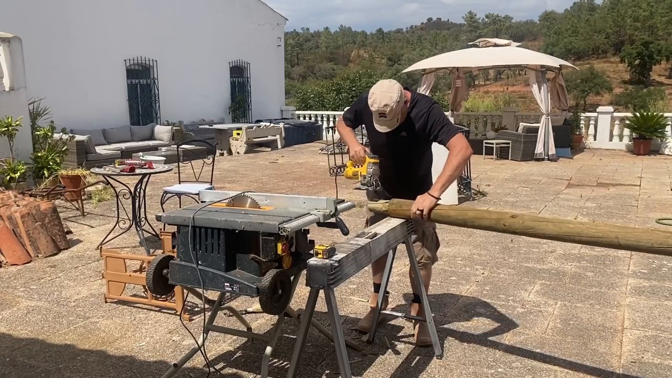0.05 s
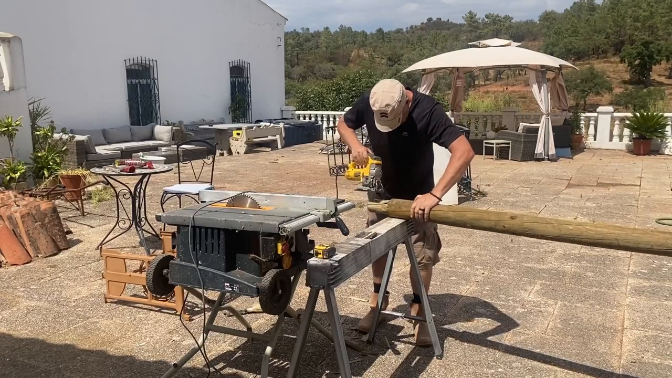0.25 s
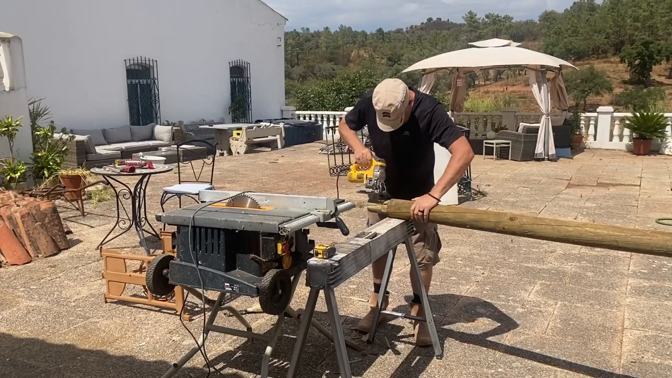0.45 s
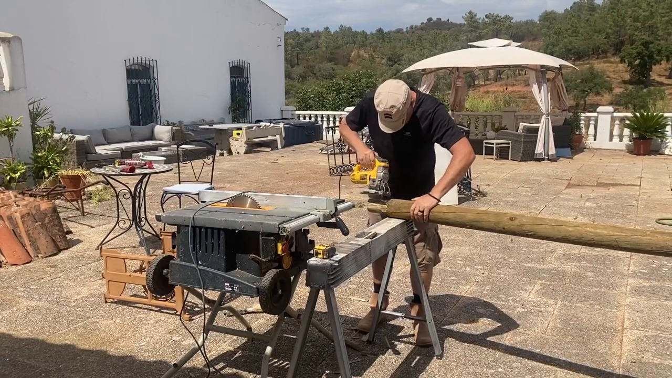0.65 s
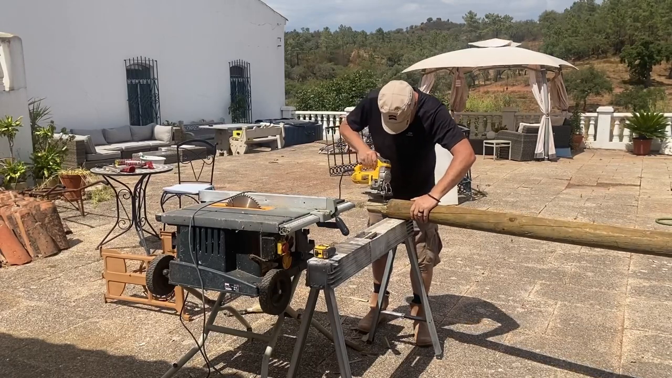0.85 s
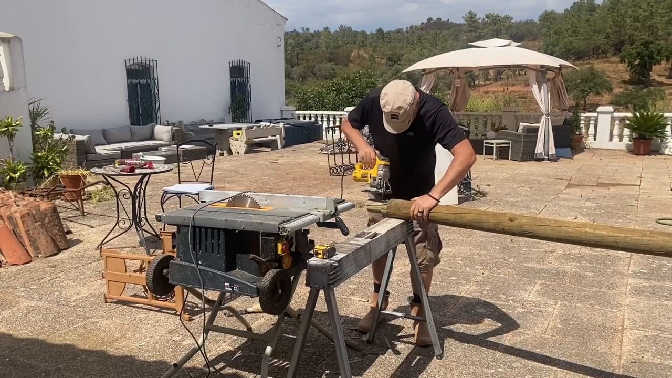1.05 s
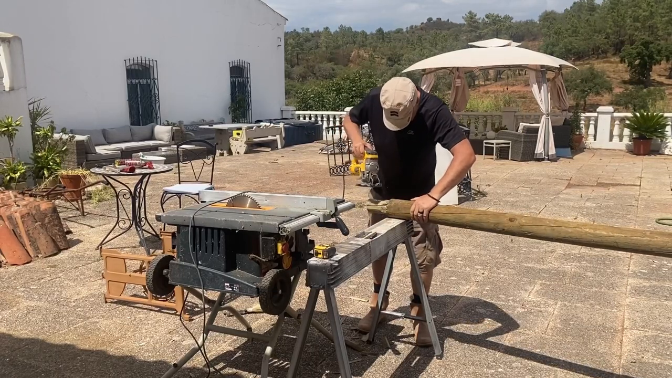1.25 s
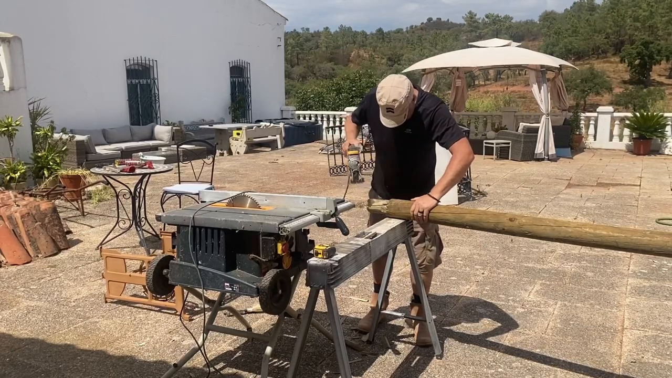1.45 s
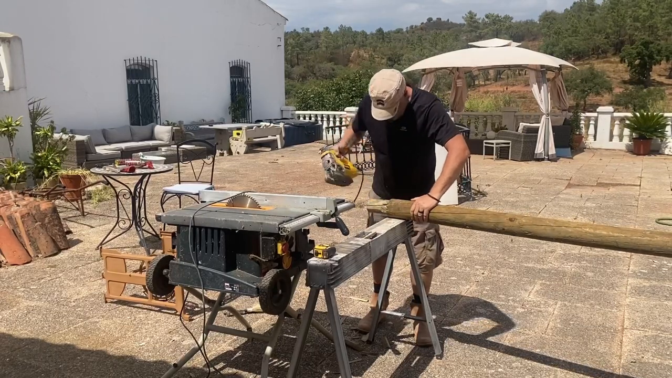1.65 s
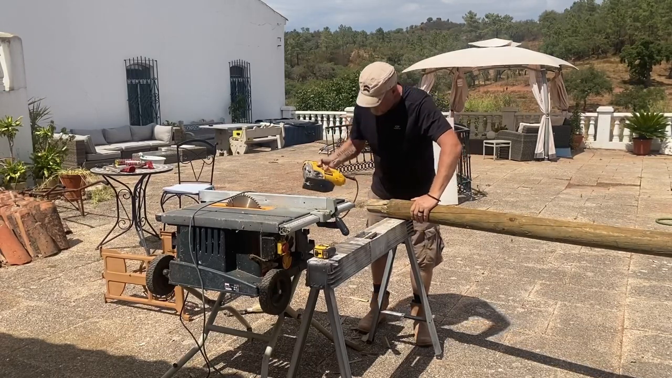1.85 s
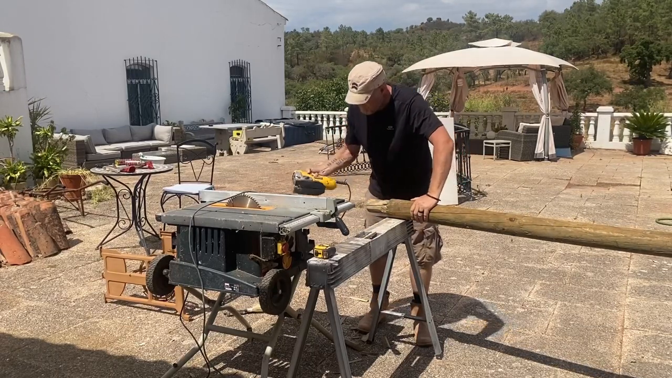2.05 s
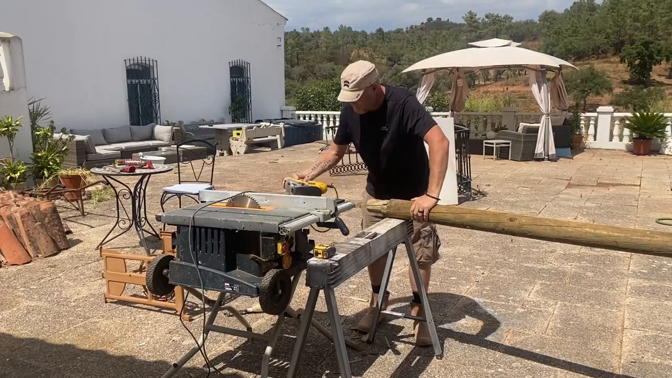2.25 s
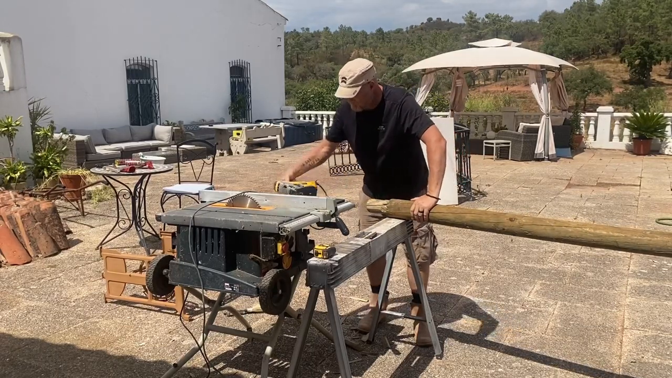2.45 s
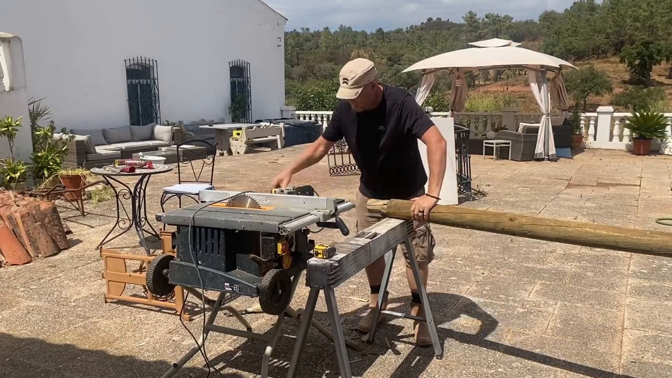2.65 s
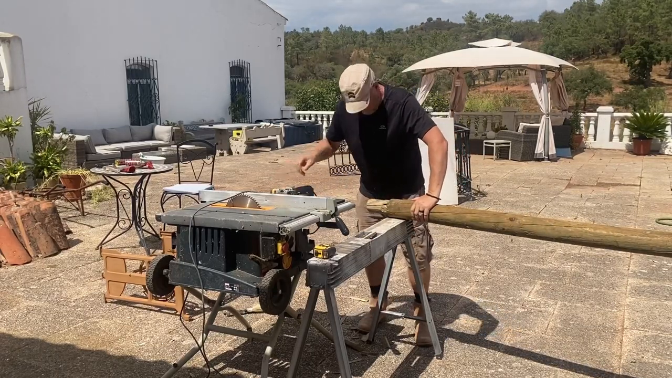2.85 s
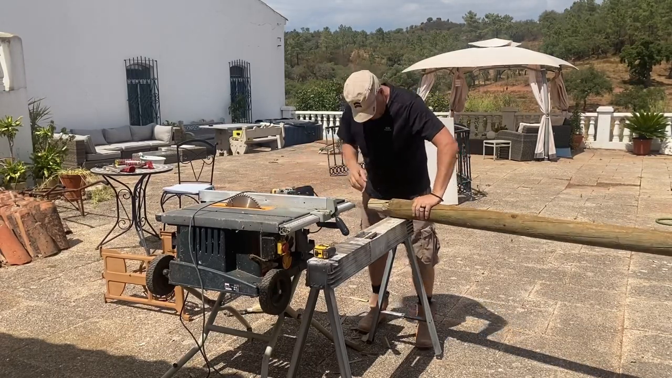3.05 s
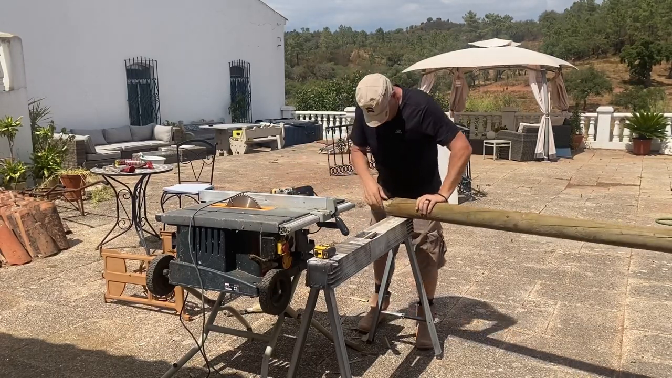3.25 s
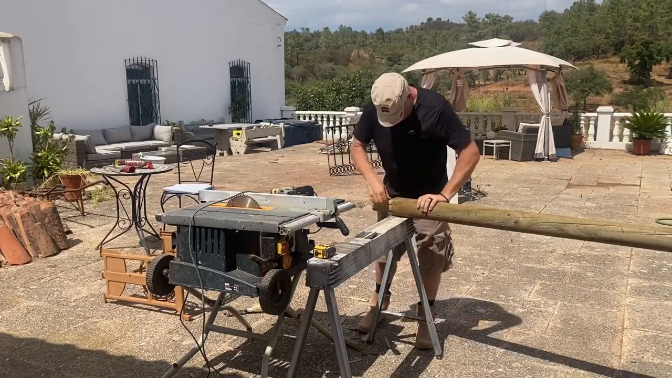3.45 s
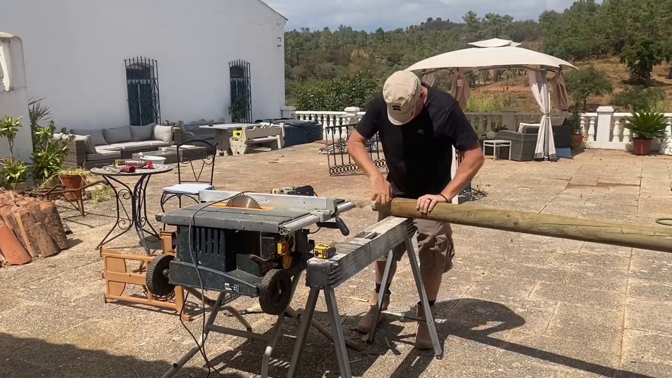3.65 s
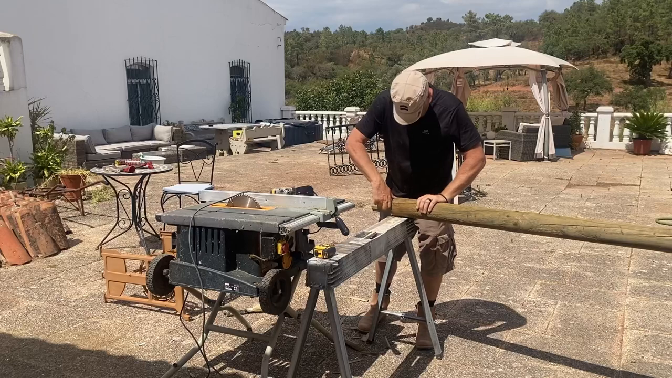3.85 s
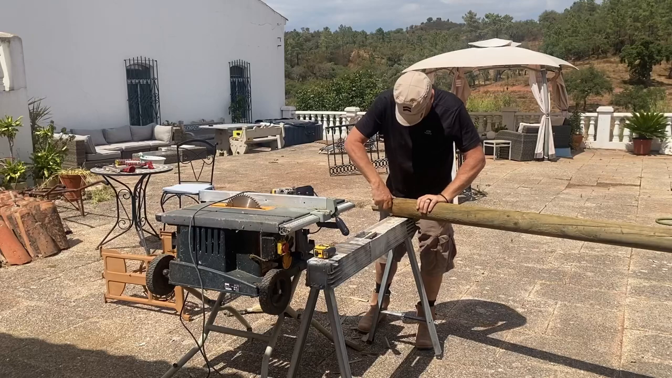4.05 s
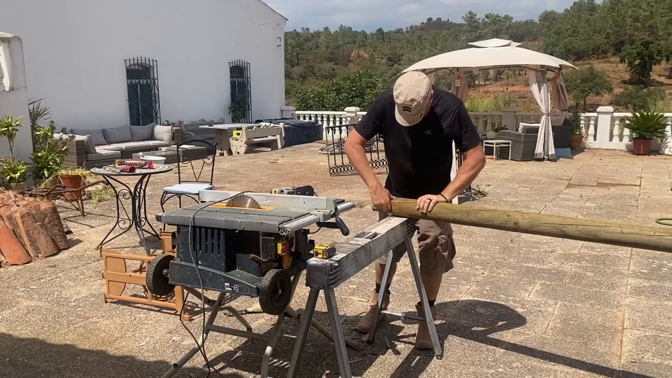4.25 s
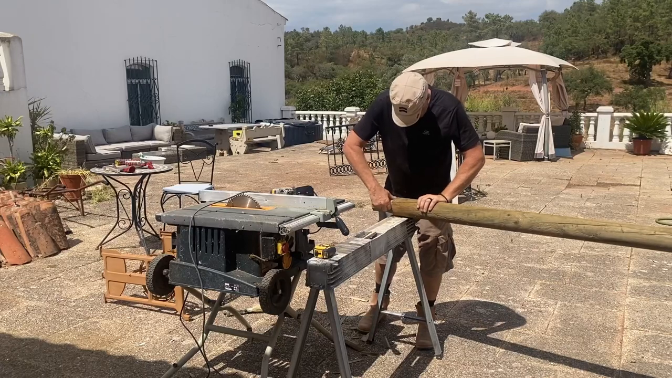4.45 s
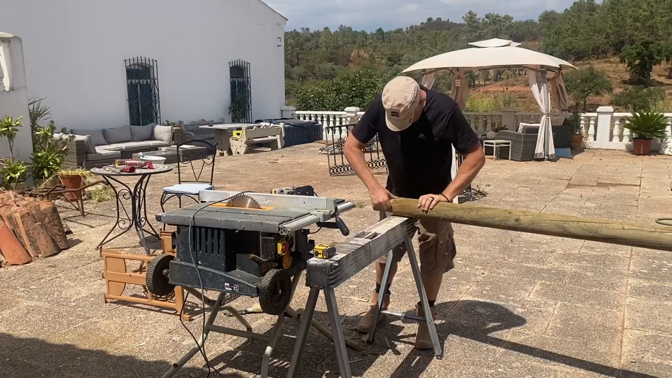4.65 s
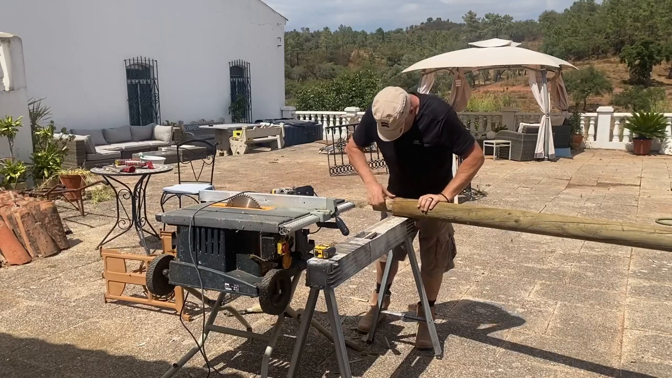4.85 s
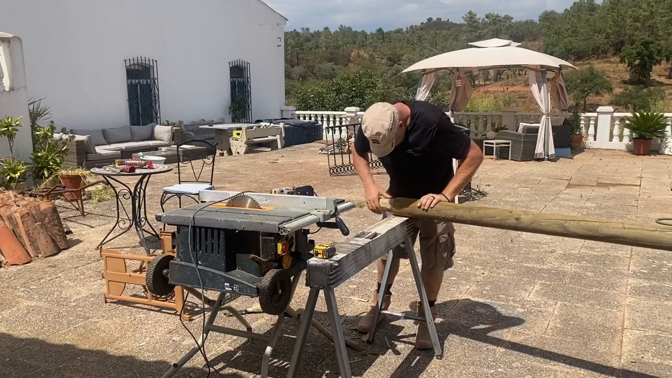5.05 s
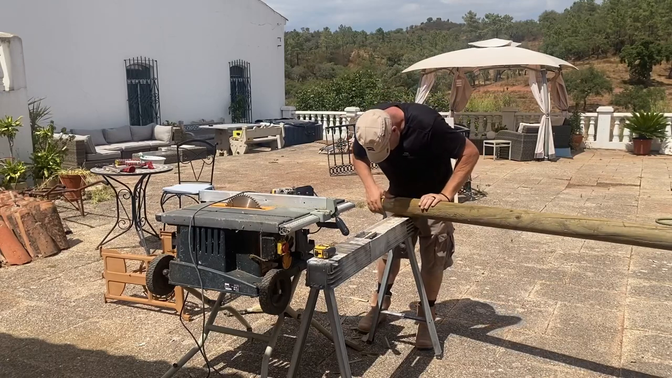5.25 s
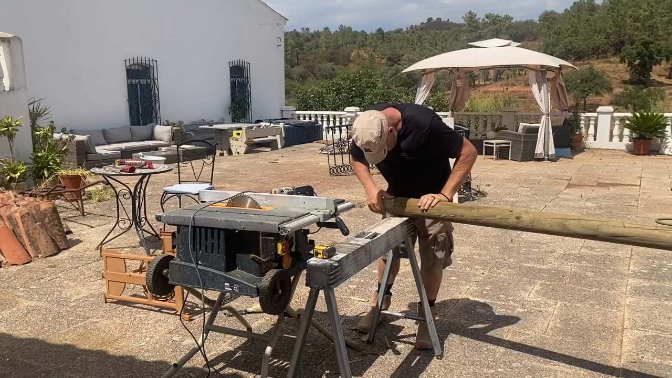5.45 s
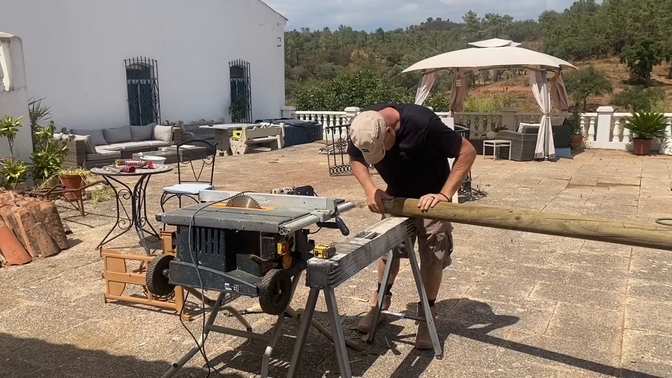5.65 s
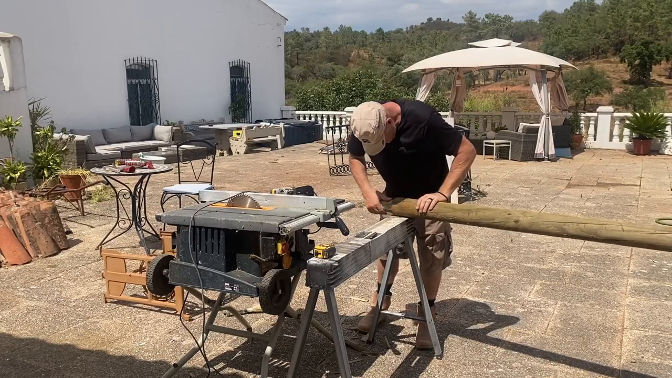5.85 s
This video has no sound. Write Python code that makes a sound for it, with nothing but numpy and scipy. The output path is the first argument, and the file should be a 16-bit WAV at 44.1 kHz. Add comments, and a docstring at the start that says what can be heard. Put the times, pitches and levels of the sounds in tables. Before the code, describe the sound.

On an open paved terrace, a handheld electric planer is already coasting down. At 0 s it is loudest: bright fan hiss, a dense midrange rattle pulsing with the belt, and a thin whine near 10 kHz that glides steadily downward and fades by about 2 s. At 0.8 s it knocks a wooden beam with a sharp crack and hollow double thump. Irregular harder clacks stand out from 1.0 to 2.1 s as the rattle slows and softens. At 2.25 s it bumps a metal saw table; a short whistle-like squeak breaks into a rasp at 2.4 s, then a heavy, ringing clunk at 2.67 s. Uneven judders and slowing slaps follow, with a brief low grating until it stops at 3.6 s. Then it is quiet: a soft low breeze freshens slightly, with small dry splinter snaps at 3.85, 4.02, 4.56 and 4.8 s, and faint finger rubs and ticks near 5.7 s.

```python
"""A handheld electric planer coasts to a stop on a walled terrace: its fan hisses, its drive rattles, a thin whine sinks.
One falling speed curve drives its whine, hums, belt slap and noise levels.
It knocks once against the beam, then is laid on a metal saw table with a bump, a squeak and a clunk: noise and modes.
Fingers pick splinters from the end of the beam, as short noise bursts and wood modes, over a light breeze of noise."""
import sys
import numpy as np
from scipy import signal
from scipy.fft import rfft, irfft
from scipy.io import wavfile
from scipy.ndimage import uniform_filter1d

SR = 44100
rng = np.random.default_rng(int(sys.argv[2]) if len(sys.argv) > 2 else 0)


def store_pcm(level_fs):
    """Save levels as 16-bit WAV."""
    pcm = np.round(np.clip(level_fs, -1, 1) * 32767).astype(np.int16)
    wavfile.write(sys.argv[1], SR, np.atleast_2d(pcm).T)


N = 260618
TIME = np.arange(N) / SR

# Spectrum of the drive's rattle. Each row: frequency in Hz, relative density in dB per Hz.
RATTLE_COLOUR = [(200, -35.5), (300, -22), (380, -9.5), (460, -5.5), (640, -14.5), (760, 2), (900, -0.5),
                 (1180, -9), (1450, -3), (2100, -3), (2650, -4.5), (3300, -4), (3900, -12.5), (4700, -11),
                 (5600, -23), (7200, -44.5)]
# Resonances of the planer's housing. Each row: frequency in Hz, width in Hz, lift in dB.
HOUSING_PEAKS = [(816, 140, 3.5), (1470, 290, 4), (1650, 70, 2.5), (1900, 130, 4), (2360, 70, 4),
                 (3000, 120, 4), (3140, 70, -4), (3300, 170, 5.5)]
# The sole grazes beam and table. Each row: start in seconds, length in seconds, drone in dB, added rattle in dB.
GRAZES = [(0.94, 0.35, -64, -48.5), (1.439, 0.17, -59.5, -87), (2.266, 0.24, -44, -52),
          (3.05, 0.1, -63, -64)]
# Modes of the wooden beam. Each row: frequency in Hz, relative level in dB, t60 in seconds.
BEAM_MODES = [(380, -8.5, .28), (537, 1, .22), (717, -1, 0.23), (888, -3, .24), (1035, -8, 0.084),
              (1088, -11.5, 0.13), (1270, -15, .16), (1640, -15.5, .16), (1725, -16.5, .16),
              (2300, -21.5, .11), (2927, -15.5, .09)]
# Phase between the two microphone ports. Each row: frequency in Hz, lead of the left in radians.
PORT_LEAD = [(80, .1), (250, .45), (650, .75), (1400, .6), (2900, .85), (3800, .2), (4800, .25),
             (5600, -.3), (6100, .3), (7200, -.2), (8000, -1.6), (9000, -3.2), (10200, -5.2), (11500, -6.3),
             (13000, -9.3)]
# Level between the two ports. Each row: frequency in Hz, left minus right in dB.
PORT_BALANCE = [(140, -1), (300, 2.5), (600, 4), (1300, 5), (2100, 5), (3100, 7.5), (4200, 6.5), (5400, 12),
                (6400, 3), (7200, .5), (12000, 0)]


def planer():
    """One sinking speed drives the whine, the hums, the slap of the drive belt and the fan's hiss."""
    # Rotor speed, given by the pitch of its whine. Each row: time in seconds, pitch in Hz.
    speed_curve = [(0, 10190), (.3, 9200), (.6, 8248), (.9, 7320), (1.0, 7070), (1.4, 5982), (1.8, 5146),
                   (2.15, 4300), (3.0, 2524), (3.62, 477.7)]
    whine_per_turn = 152.4  # whine cycles in one turn of the belt
    stop_s, stop_fade_db_per_s = 3.6, 253
    slap_softens = .8  # how far the slap's exponent falls by standstill
    pitch = np.interp(TIME, *np.transpose(speed_curve))
    slowed = (1 - pitch / pitch[0]) ** 2  # square of the share of speed lost
    belt_hz = pitch / whine_per_turn
    slap = chatter(belt_hz, decay=.045, uneven_db=2, steady=.55)
    slap = slap ** (1 - slap_softens * slowed)
    shake = amp(-32 - 38 * slowed)  # the rattle sinks by 38 dB at standstill
    tool = rattle(slap, slowed, shake) + grating(stop_s) + fan_hiss(slap, slowed) + drone(slap, slowed)
    tool += hums(belt_hz, slap, shake * (pitch / pitch[0]) ** 2.8)  # imbalance fades faster than the rattle
    tool += whine(pitch, slowed)
    turning = amp(-stop_fade_db_per_s * np.maximum(TIME - stop_s, 0))
    return turning * tool + judders()


def chatter(belt_hz, decay, uneven_db, steady):
    """Loose parts slap once a turn, each time with another force; returns an envelope."""
    limp_db = .4  # the belt slaps alternately harder and softer
    turns = np.floor(np.cumsum(belt_hz) / SR)
    force = amp(uneven_db * rng.uniform(-0.76, 1, N) + limp_db * (-1) ** turns)
    slaps = np.diff(turns, prepend=0) * force
    envelope = steady + signal.oaconvolve(slaps, dying(decay, .0012, size=SR // 4))[:N]
    return envelope / np.sqrt(uniform_filter1d(envelope ** 2, SR // 4))


def rattle(slap, slowed, shake):
    """Smooth noise and clustered clicks of loose parts ring in the housing."""
    blur_db = -2  # the smooth part of the rattle
    blur = amp(blur_db) * mottled(noise(RATTLE_COLOUR, size=N, peaks=HOUSING_PEAKS)) * slap
    grazing = sum(arch(s, length) * amp(db) for s, length, _, db in GRAZES)
    sound = (blur + clatter(slap) * amp(-4 * slowed)) * (shake + grazing)
    # the small housing radiates little bass
    return signal.sosfilt(signal.butter(4, 320, "highpass", fs=SR, output="sos"), sound)


def mottled(x):
    """The rattle's colour shifts at random, in smooth patches of time and frequency."""
    depth_db, smooth_hz, smooth_s = 2.5, 220, .044
    hz, t, z = signal.stft(x, SR, nperseg=1024, noverlap=768)
    along_t = np.fft.fftfreq(len(t), t[1])[:, None]
    along_hz = np.fft.fftfreq(len(hz), hz[1])
    smooth = np.exp(-(along_t * smooth_s) ** 2 - (along_hz * smooth_hz) ** 2)
    grain = np.fft.fft2(rng.standard_normal(smooth.shape))
    patches = unit(np.fft.ifft2(grain * smooth).real).T
    return signal.istft(z * unit(amp(depth_db * patches)), SR, nperseg=1024, noverlap=768)[1][:, :N]


def clatter(slap, count=12):
    """Several loose parts click in clusters under each slap; the hard slaps stand out."""
    # Now and then the belt slaps harder, with a sharp clack. Each row: start in seconds, dB against the rattle.
    hard_slaps = [(.168, 5.5), (.266, -1), (.331, 4), (.416, 4), (.51, 5), (.595, 3), (.652, 3), (.687, 6),
                  (1.033, 10), (1.078, 3.5), (1.168, 5.5), (1.36, 7), (1.623, 1), (1.681, 2), (1.743, 10),
                  (1.798, 9), (1.857, 7.5), (1.919, 9), (2.123, 3)]
    clicks_per_s = 700  # all parts together, where the slap envelope is 1
    clicks_db, spread_db = -3, 3.5  # level against the rattle, spread of sizes
    out = np.zeros((2, N))
    for _ in range(count):
        hit = rng.random(N) < clicks_per_s / count / SR * slap ** 3
        sizes = amp(spread_db * np.minimum(rng.exponential(1, N), 2))
        out += signal.oaconvolve((hit * sizes)[None], clack(t60=.012), axes=1)[:, :N]
    out *= amp(clicks_db) / np.std(out.mean(0))
    for s, db in hard_slaps:
        add(out, s, amp(db) * clack(t60=0.045))
    return out


def clack(t60):
    """One loose part strikes the housing: a very short burst of its resonances."""
    return noise(RATTLE_COLOUR, size=4096, peaks=HOUSING_PEAKS) * dying(t60, 0.00043, size=4096)


def fan_hiss(slap, slowed):
    """The fan's turbulent air hisses, lightly modulated by the slap."""
    # Spectrum of the hiss. Each row: frequency in Hz, relative density in dB per Hz.
    hiss_colour = [(2500, -29.5), (4000, -2.5), (4900, -1), (5600, -9), (6500, -1.5), (7800, -1),
                   (9000, -13.5), (10500, -6.5), (12200, -15), (13000, -18), (16000, -31)]
    level_db, fall_db = -38.5, 45.5  # at full speed, fall by standstill
    return noise(hiss_colour, size=N) * slap ** 0.6 * amp(level_db - fall_db * slowed + 1.3 * wander(600))


def whine(pitch, slowed):
    """A thin tone sinks with the rotor and swells or dips as it sweeps through resonances."""
    # Resonances in the whine's path. Each row: frequency in Hz, width in Hz, lift in dB.
    whine_peaks = [(8400, 250, 2), (9200, 480, -11.5), (7563, 490, 13.5), (6973, 170, 10), (6470, 200, 9)]
    level_db, fall_db = -36.5, 104.5  # at full speed, fall by standstill
    sound = tone(np.cumsum(pitch * (1 + 0.0055 * wander(300))) / SR, pitch)
    return sound * amp(level_db - fall_db * slowed + bumps(whine_peaks, pitch) + 1.7 * wander(30))


def hums(belt_hz, slap, level):
    """Wavering hums at fixed multiples of the belt's turn sink with the speed."""
    # Each row: multiple of the belt's turn, relative level in dB, waver as a share of the pitch.
    hum_rows = [(1.12, -29, .068), (6.002, -25.5, 0.013), (7.4, -25.5, 0.014), (8.49, -20.5, 0.011),
                (12.68, -21.5, 0.007), (13.8, -6, .005), (15.24, -16, 0.0078), (17.7, -21, 0.008),
                (23.96, -18, .006), (46.2, -17.5, 0.0026), (57, -23, .002), (77, -24, .002),
                (88, -24, 0.0018)]
    out = np.zeros((2, N))
    for multiple, db, waver in hum_rows:
        turns = multiple * np.cumsum(belt_hz * (1 + waver * wander(34))) / SR
        out += amp(db) * tone(turns, multiple * belt_hz)
    return out * level * slap


def drone(slap, slowed):
    """The body drones low, more so in a graze; once laid down, the tool makes the table drone too."""
    # Spectrum of the drone. Each row: frequency in Hz, relative density in dB per Hz.
    drone_colour = [(30, -27.5), (70, -3), (130, -4.5), (240, -3.5), (345, -4), (420, -4), (550, -2),
                    (800, -8), (1400, -24)]
    # Resonances of the table that the coasting tool shakes. Each row: frequency in Hz, width in Hz, lift in dB.
    table_peaks = [(365, 34, 6), (600, 70, 4), (883, 40, 10.5), (1250, 300, 10.5), (1620, 160, 19.5)]
    level_db, fall_db = -61, 37  # at full speed, fall by standstill
    laid_s, table_db, table_fade_db_per_s = 2.26, -47, 9.5
    grazing = sum(arch(s, length) * amp(db) for s, length, db, _ in GRAZES)
    body = noise(drone_colour, size=N) * (amp(level_db - fall_db * slowed) + grazing)
    on_table = (TIME > laid_s) * amp(table_db - table_fade_db_per_s * (TIME - laid_s))
    table = noise(drone_colour, size=N, peaks=table_peaks) * on_table * amp(1.5 * wander(25))
    return (body + table) * slap ** .5


def grating(stop_s):
    """The drive drags and grates in its last turns, lower than its rattle, swelling up to the stop."""
    # Resonances of the dragging drive. Each row: frequency in Hz, width in Hz, lift in dB.
    drag_peaks = [(2100, 600, 1), (4914, 290, 15)]
    level_db, rise_db_per_s = -57, 101.5
    drag = amp(level_db - rise_db_per_s * np.maximum(stop_s - TIME, 0))
    return noise(hump(centre_hz=1490, width=0.87), size=N, peaks=drag_peaks) * drag * amp(1.6 * wander(150))


def judders():
    """Short, uneven rattles of the tool against the table: narrow noise bursts."""
    # Each row: start in seconds, level in dB, centre in Hz.
    judder_rows = [(2.775, -54, 1700), (2.840, -38, 1630), (2.914, -39.5, 1620), (2.940, -44.5, 1540),
                   (3.079, -44, 1600), (3.126, -48, 1620), (3.182, -49, 1650), (3.202, -49, 1620),
                   (3.260, -46, 1560), (3.274, -55, 1700), (3.388, -52, 1670), (3.526, -49, 2000),
                   (3.565, -53, 2000)]
    out = np.zeros((2, N))
    for s, db, centre_hz in judder_rows:
        add(out, s, amp(db) * burst(hump(centre_hz, width=0.13), t60=0.059, rise=0.0032))
    return out


def ticks():
    """Thin, bright ticks of the slowing tool: short high noise bursts."""
    # Each row: start in seconds, level in dB.
    tick_rows = [(1.47, -34.5), (1.69, -35), (2.029, -44), (2.737, -57), (2.864, -48), (3.025, -68),
                 (3.169, -69), (3.438, -49), (3.46, -52)]
    out = np.zeros((2, N))
    for s, db in tick_rows:
        add(out, s, amp(db) * burst(hump(centre_hz=8840, width=0.54), t60=0.02, rise=0.0022))
    return out


def blows():
    """A sharp crack, a short woody body, the ringing shell, table or beam and a slower thud."""
    # Blows of the planer on beam and table. Each row: start in seconds, then crack, body, planer ringing,
    # table ringing, beam ringing and low thud in dB, then crack tilt and ringing tilt in dB per octave.
    blow_rows = [(.8225, -20.5, -36.5, -60, -89, -46.5, -63.5, 2.5, 2),
                 (.8245, -12.5, -29.5, -40, -42, -25, -48, 1, -0.5),
                 (.8636, -17.5, -29, -47, -31, -28.5, -36, -1.5, -4.5),
                 (.879, -24, -36, -64, -37, -42, -34, -0.5, -4),
                 (2.248, -31, -37.5, -46.5, -61, -92, -70.5, 3, 3),
                 (2.2575, -26.5, -28, -30, -46, -89.5, -64, -2, -0.5),
                 (2.326, -51, -37.5, -45, -38.5, -90, -63.5, -8.5, 2),
                 (2.673, -20.5, -30.5, -60.5, -59, -89, -52, -7, -1),
                 (2.675, -17, -20.5, -42.5, -21, -90.5, -43, -7.5, -.5),
                 (2.6954, -35.5, -28, -61, -28.5, -90, -40, 0.5, -2),
                 (2.724, -41, -33.5, -60, -36.5, -90, -44, -8.5, -4.5),
                 (2.745, -52, -39, -60, -46, -90, -43, -10, -11),
                 (2.808, -58, -45, -60, -49, -90, -44, -7, -8)]
    # Spectra of the three noise parts. Each row: frequency in Hz, relative density in dB per Hz.
    crack_colour = [(300, -15), (800, -3.5), (1400, -1.5), (2200, -1.5), (3600, -7), (5000, -5),
                    (6000, -15.5), (8000, -12), (12000, -25.5), (16000, -37.5)]
    body_colour = [(100, -24), (190, -7.5), (240, -0.5), (290, -4), (345, -1.5), (430, -7), (560, 4),
                   (740, .5), (950, -4.5), (1200, -3), (1600, -13), (2600, -27.5), (5000, -35)]
    thud_colour = [(25, -42.5), (48, -19), (70, -2), (110, -11.5), (200, -9), (400, -27.5)]
    # Modes of the planer's shell and of the saw table. Each row: frequency in Hz, relative level in dB, t60 in seconds.
    shell_modes = [(285, -12.5, .3), (493, -4.5, .17), (621, 0.5, 0.29), (810, -1, .28), (1207, -5, .09),
                   (1480, -16, 0.16)]
    table_modes = [(161, -14, 0.26), (219, -8.5, 0.19), (242, 0.5, .22), (345.3, 0, .26), (395, -12.5, .3),
                   (458, -11, 0.37), (537, -1, 0.23), (598, -3.5, 0.19), (732, -7.5, .17), (838, -8.5, .26),
                   (1036, -9.5, .19), (1142, -11.5, 0.16), (1201, -13, 0.22), (1443, -19.5, 0.19),
                   (1580, -15.5, .16), (2030, -20, .15)]
    out = np.zeros((2, N))
    for s, crack_db, body_db, shell_db, table_db, beam_db, thud_db, tilt, ring_tilt in blow_rows:
        tilted = [(f, db + tilt * np.log2(f)) for f, db in crack_colour]
        add(out, s, amp(crack_db) * burst(tilted, t60=0.055, rise=0.00043))
        add(out, s, amp(body_db) * burst(body_colour, t60=0.15, rise=0.00086))
        add(out, s, amp(thud_db) * burst(thud_colour, t60=0.35, rise=.004))
        for modes, db in (shell_modes, shell_db), (table_modes, table_db), (BEAM_MODES, beam_db):
            add(out, s, amp(db) * ring(modes, ring_tilt))
    return out


def squeak():
    """The sole sticks and slips on the table: a clean whistle breaks into a rasp at a third of its pitch."""
    # Harmonics from the fundamental up. Each row: relative level in dB, hold in seconds.
    whistle_partials = [(1, 0.015), (-10.5, .001), (-33.5, .006)]
    rasp_partials = [(-12, 0.028), (0.5, 0.044), (-8, .03), (-5, .034), (-6.5, .032), (-4.5, 0.016),
                     (-15, 0.0084), (-21.5, .02), (-28, .015), (-22, .02)]
    whistle = squeal(whistle_partials, s=2.399, hz=2088, db=-17, rise=.02, t60=.08, jitter=.0015, flutter_db=.5)
    rasp = squeal(rasp_partials, s=2.434, hz=717, db=-31.0, rise=0.013, t60=.16, jitter=.02, flutter_db=4.5)
    return whistle + rasp


def squeal(partials, s, hz, db, rise, t60, jitter, flutter_db):
    """Harmonics swell together, flutter, and let go each after its own hold."""
    out, on = np.zeros((2, N)), abs(TIME - s) < .25
    t = TIME[on] - s
    turns = np.cumsum(hz * (1 + jitter * wander(300, size=SR)[:len(t)])) / SR
    for k, (part_db, hold) in enumerate(partials, 1):
        swell = (np.minimum(t, 0) / rise) ** 2
        fall = np.log(1000) * np.maximum(t - hold, 0) / t60
        level = amp(db + part_db + flutter_db * wander(120, size=SR)[:len(t)])
        out[:, on] += level * np.exp(-swell - fall) * tone(k * turns, k * hz)
    return out


def snaps():
    """Splinters break off with a noise burst, and the beam rings hollowly."""
    # Each row: start in seconds, level in dB, centre in Hz, width in octaves, t60 in seconds,
    # ringing of the beam in dB, its tilt in dB per octave.
    snap_rows = [(3.853, -54, 1060, 0.29, 0.15, -70, 9.5), (3.856, -50.5, 2100, 1.2, 0.043, -85, 11.5),
                 (4.0244, -39, 2300, .73, 0.034, -56.5, -1.5), (4.029, -62, 2590, 1.2, 0.18, -79, -9),
                 (4.034, -55, 528, 0.17, 0.28, -90, 0), (4.412, -73, 7480, .52, .054, -100, -1),
                 (4.5592, -39.5, 2410, .17, 0.029, -90, 1), (4.560, -38.5, 3470, 0.18, 0.015, -100, 0),
                 (4.562, -56.5, 6960, 0.25, 0.056, -100, 0), (4.661, -60.5, 2384, 0.65, .045, -88, 3),
                 (4.795, -57.5, 2850, 0.15, .04, -94.5, -1), (5.662, -66, 2690, 0.27, 0.05, -88, 6),
                 (5.688, -62, 2620, .34, .06, -84, 8)]
    out = np.zeros((2, N))
    for s, db, centre_hz, width, t60, beam_db, tilt in snap_rows:
        add(out, s, amp(db) * burst(hump(centre_hz, width), t60, rise=0.0023))
        add(out, s, amp(beam_db) * ring(BEAM_MODES, tilt))
    return out


def twangs():
    """A flicked splinter twangs in its own modes."""
    # Each row: start in seconds, level in dB.
    twang_rows = [(4.561, -65), (4.796, -56.5)]
    # Modes of the splinter. Each row: frequency in Hz, relative level in dB, t60 in seconds.
    splinter_modes = [(1710, -12, .13), (2300, -5, .045), (2490, -4, .04), (2980, 1.5, 0.048),
                      (3300, -4, .04)]
    out = np.zeros((2, N))
    for s, db in twang_rows:
        add(out, s, amp(db) * ring(splinter_modes, tilt=0))
    return out


def fingers():
    """Fingers rub along the wood in strokes of noise, and the hands rustle faintly on the beam."""
    # Each row: start in seconds, length in seconds, level in dB.
    rub_rows = [(3.681, 0.044, -74), (3.757, 0.13, -76.5), (4.05, .3, -95), (5.081, 0.24, -89),
                (5.4, .13, -88), (5.7, 0.12, -84), (5.841, 0.076, -77)]
    # Spectrum of the rubbing. Each row: frequency in Hz, relative density in dB per Hz.
    rub_colour = [(900, -9), (2000, -5), (3300, -2.5), (4100, -7.5), (6000, -27), (10000, -21)]
    grip_s, grip_db = 4.05, -90.5  # the faint rustle starts here
    rubbing = sum(arch(s, length) * amp(db) for s, length, db in rub_rows) + amp(grip_db) * (TIME > grip_s)
    return noise(rub_colour, size=N) * rubbing * amp(2.0 * wander(120))


def terrace(x, wet_db):
    """Paving and house walls scatter a thin tail: sparse random echoes that die at each frequency's own pace."""
    # Each row: frequency in Hz, t60 in seconds.
    tail_t60 = [(100, 0.58), (500, 0.5), (2000, 0.68), (8000, 0.28)]
    sparse = rng.random((2, SR)) < 2000 / SR  # echoes a second
    taps = rng.standard_normal((2, SR)) * sparse * (np.arange(SR) > .012 * SR)
    hz, t, z = signal.stft(taps, SR, nperseg=256)
    z[1, hz < 200] = z[0, hz < 200]  # the bass is alike in both ports
    fade = np.exp(-np.log(1000) * t / read(tail_t60, hz)[:, None])
    tail = signal.istft(z * fade, SR, nperseg=256)[1]
    return x + amp(wet_db) * signal.fftconvolve(x, tail / np.linalg.norm(tail[0]), axes=1)[:, :N]


def outdoors():
    """A lumpy low breeze, calm and then fresher, under faint far hiss."""
    # Spectra of breeze and far hiss. Each row: frequency in Hz, relative density in dB per Hz.
    breeze_colour = [(25, -21.5), (45, -10), (75, -1), (110, -5.5), (170, -7.5), (300, -12.5), (450, -14.5),
                     (700, -25), (1200, -37.5)]
    air_colour = [(700, 2), (1000, 0), (1700, -2.5), (3000, -15), (4700, -16), (7500, -16), (10000, -22.5),
                  (15500, -28)]
    calm_db, fresh_db, freshens_s, rise_s = -71.5, -65, 3.83, 0.49
    fresh = np.clip((TIME - freshens_s) / rise_s, 0, 1)
    breeze = noise(breeze_colour, size=N) * amp(calm_db + (fresh_db - calm_db) * fresh + 1.1 * wander(7.5))
    return breeze + noise(air_colour, size=N) * amp(-80.5 + .8 * wander(6))


def noise(colour, size, peaks=()):
    """Stereo noise with a spectrum that falls away past its ends, and resonances on top."""
    hz = np.fft.rfftfreq(size, 1 / SR)
    octaves_outside = abs(np.log2((hz + 1) / np.clip(hz + 1, colour[0][0], colour[-1][0])))
    db = read(colour, hz) - 30 * octaves_outside + bumps(peaks, hz)
    a, b = np.exp(2j * np.pi * rng.random((2, len(hz))))
    x = irfft(ports(a, b, hz) * amp(db), size)
    return x / np.std(x.mean(0))


def burst(colour, t60, rise):
    """Dense modes struck together, as noise that dies away."""
    return noise(colour, size=SR) * dying(t60, rise, size=SR)


def ring(modes, tilt):
    """Struck modes start together and die away, each beating with a weak twin; tilt in dB per octave."""
    twin_share, twin_split_hz = 0.25, 12
    t, out = np.arange(SR) / SR, np.zeros((2, SR))
    for k, (f, db, t60) in enumerate(modes):
        pair = tone(f * t, f) + twin_share * tone((f + twin_split_hz) * t + rng.random(), f)
        level = amp(db + tilt * np.log2(f / modes[0][0]))
        out += (-1) ** k * level * pair * dying(t60, rise=.0012, size=SR)
    return out


def tone(turns, hz):
    """A sine as the two ports pick it up."""
    side = amp(read(PORT_BALANCE, hz) / 2)
    left = side * np.sin(2 * np.pi * turns)
    right = np.sin(2 * np.pi * turns - read(PORT_LEAD, hz)) / side
    return np.array([left, right])


def ports(a, b, hz):
    """Two unrelated spectra become a left and a right one, partly alike."""
    # Each row: frequency in Hz, likeness of the ports from 0 to 1.
    port_likeness = [(80, .98), (350, .86), (700, .7), (1200, .55), (2400, .88), (4000, .8), (5600, .6),
                     (6600, .9), (9000, .9), (12000, .8)]
    same = np.clip(read(port_likeness, hz), 0, 1)
    side = amp(read(PORT_BALANCE, hz) / 2)
    right = (same * a + np.sqrt(1 - same ** 2) * b) * np.exp(-1j * read(PORT_LEAD, hz))
    return np.array([a * side, right / side])


def dying(t60, rise, size):
    """A quick rise and an exponential fall."""
    t = np.arange(size) / SR
    return (1 - np.exp(-t / rise)) * np.exp(-np.log(1000) * t / t60)


def arch(s, length):
    """Gain at every sample for a stroke that swells and fades."""
    return np.sin(np.pi * np.clip((TIME - s) / length, 0, 1))


def wander(hz, size=N):
    """A smooth random curve of rms 1, with little movement faster than hz."""
    keep = np.exp(-(np.fft.rfftfreq(size, 1 / SR) / hz) ** 2)
    return unit(irfft(rfft(rng.standard_normal(size)) * keep, size))


def bumps(peaks, hz):
    """The lift in dB that resonances give at these frequencies."""
    return sum(g / (1 + (2 * (hz - f) / w) ** 2) for f, w, g in peaks)


def hump(centre_hz, width):
    """A spectrum with one hump, its width in octaves."""
    hz = np.geomspace(200, 14000, num=120)
    octaves = np.log2(hz / centre_hz)
    return np.column_stack([hz, -15 * np.log10(1 + (octaves / width) ** 2) - 3 * octaves ** 2])


def read(points, hz):
    """A curve over frequency joined by straight lines on a log axis."""
    f, value = np.transpose(points)
    return np.interp(np.log(hz + 1), np.log(f + 1), value)


def amp(db):
    """Decibels to a gain."""
    return 10 ** (np.asarray(db) / 20)


def unit(x):
    """Scale to an rms of 1."""
    return x / np.sqrt(np.mean(x ** 2) + 1e-20)


def add(mix, s, sound):
    """Lay a sound into the mix from s seconds on, cut off at the end."""
    part = mix[..., max(round(s * SR), 0):][..., :sound.shape[-1]]
    part += sound[..., :part.shape[-1]]


def scene():
    """Tool, blows and fingers on the terrace, in the open air."""
    knocks = terrace(blows(), wet_db=-10.0)
    squeaking = terrace(squeak(), wet_db=-23)
    small_sounds = terrace(ticks() + snaps() + twangs() + fingers(), wet_db=-15.5)
    return planer() + knocks + squeaking + small_sounds + outdoors()


def record(dry):
    """The recorder's bass cut and band limit."""
    lean = signal.sosfilt(signal.butter(3, 48, "highpass", fs=SR, output="sos"), dry)
    band_limit = signal.firwin(511, 15800, window=("kaiser", 9), fs=SR)
    return signal.oaconvolve(lean, band_limit[None], "same")


dry = scene()
out = record(dry)
store_pcm(out)
```